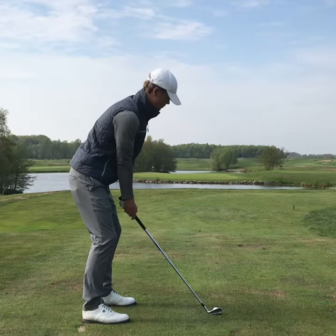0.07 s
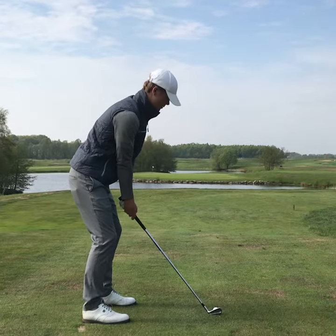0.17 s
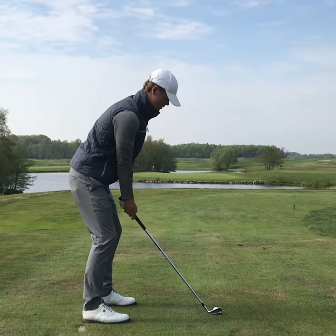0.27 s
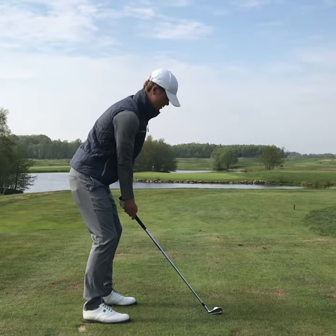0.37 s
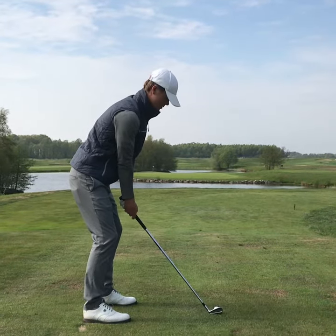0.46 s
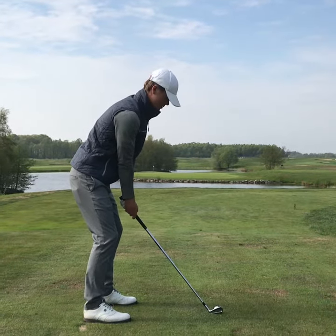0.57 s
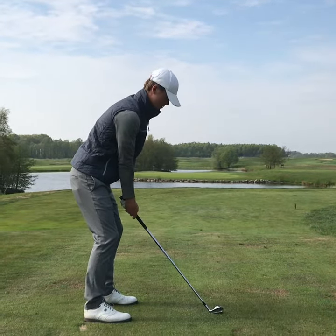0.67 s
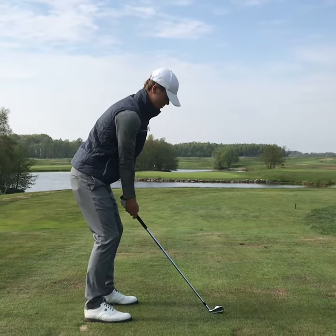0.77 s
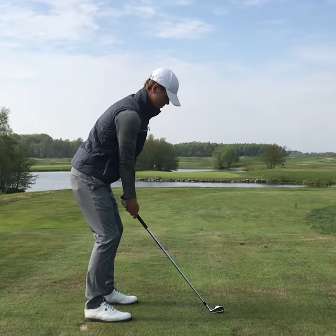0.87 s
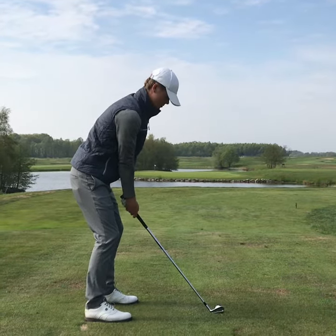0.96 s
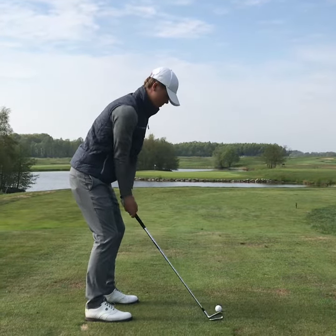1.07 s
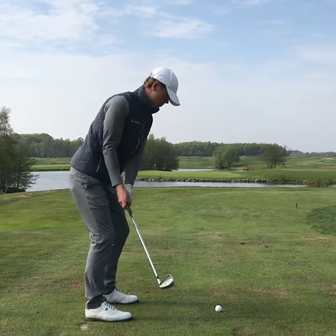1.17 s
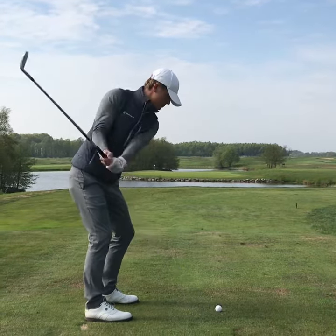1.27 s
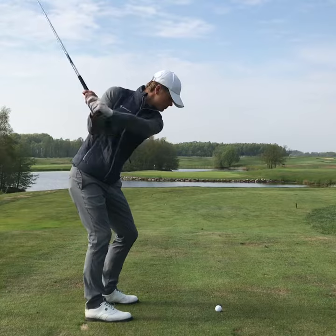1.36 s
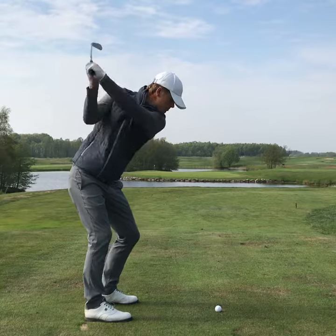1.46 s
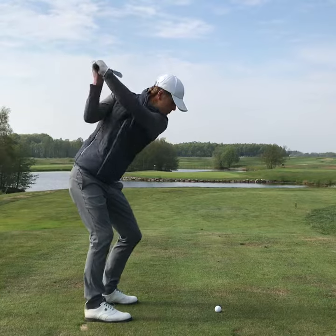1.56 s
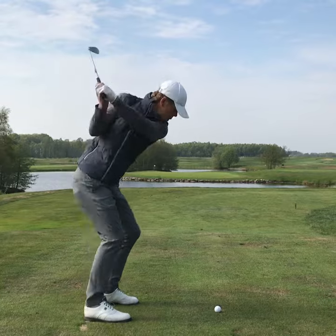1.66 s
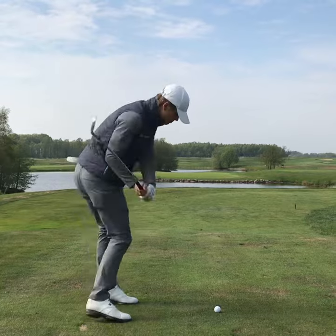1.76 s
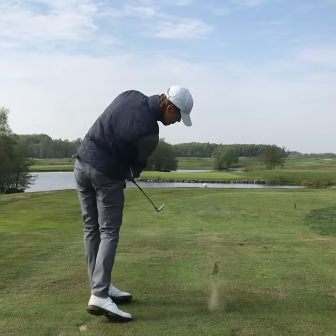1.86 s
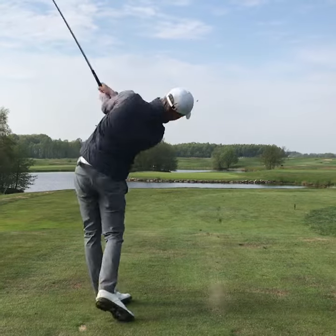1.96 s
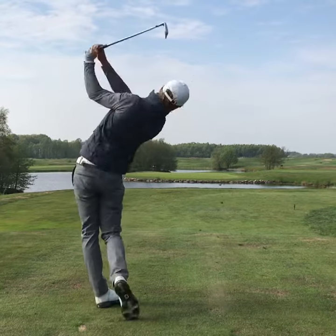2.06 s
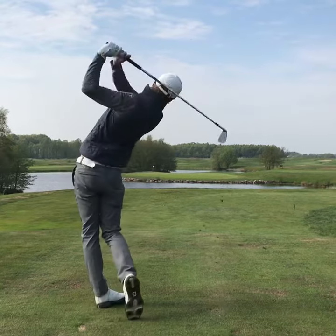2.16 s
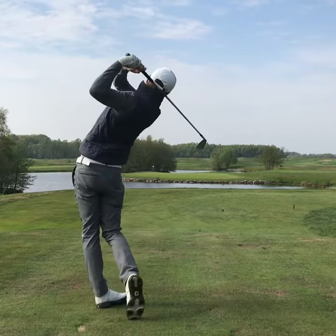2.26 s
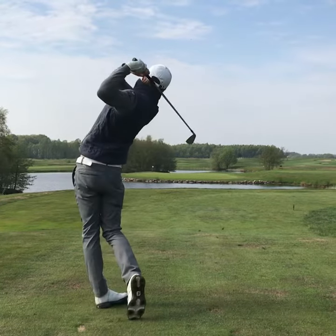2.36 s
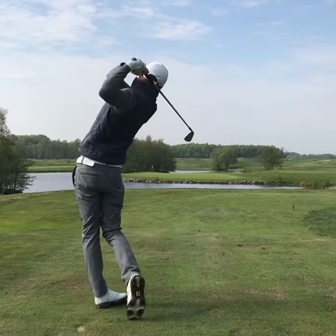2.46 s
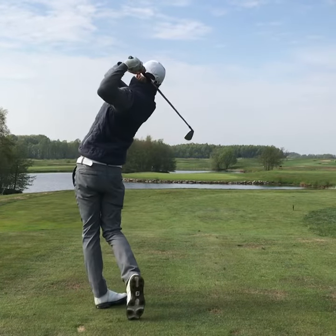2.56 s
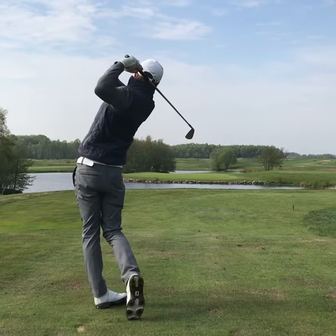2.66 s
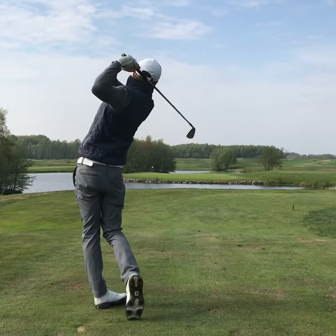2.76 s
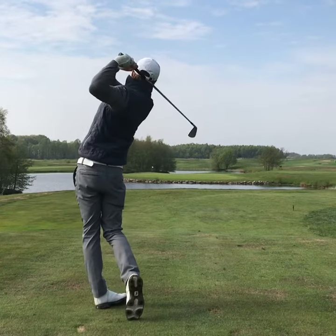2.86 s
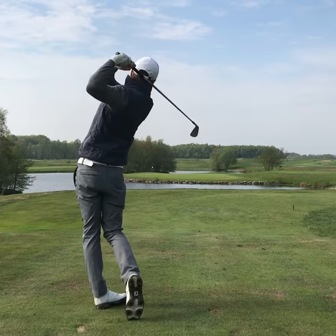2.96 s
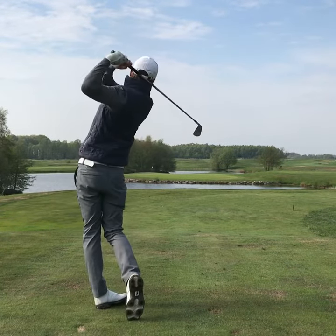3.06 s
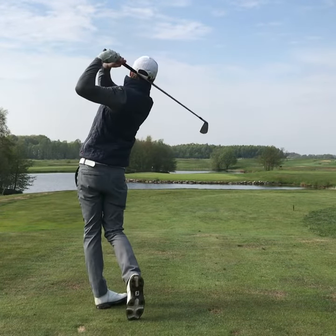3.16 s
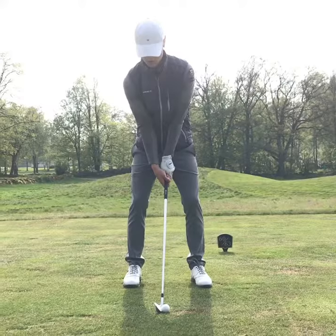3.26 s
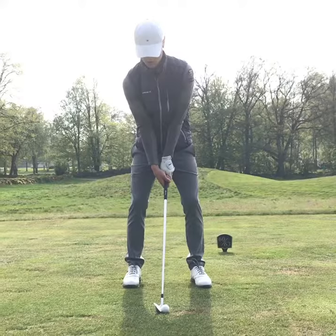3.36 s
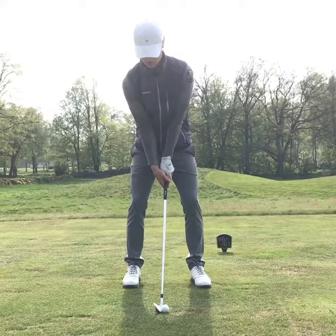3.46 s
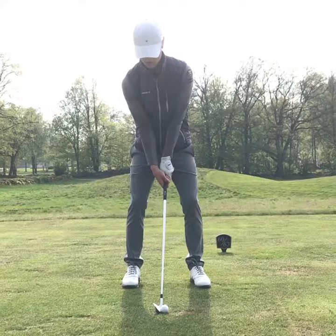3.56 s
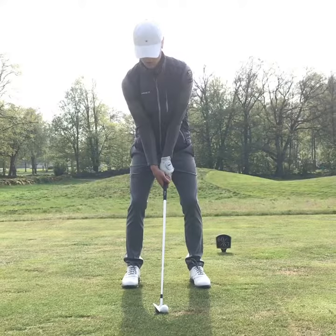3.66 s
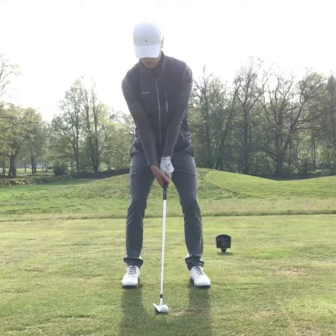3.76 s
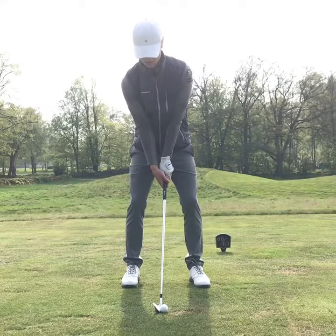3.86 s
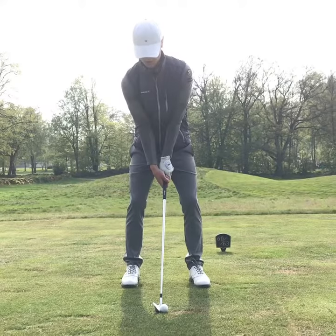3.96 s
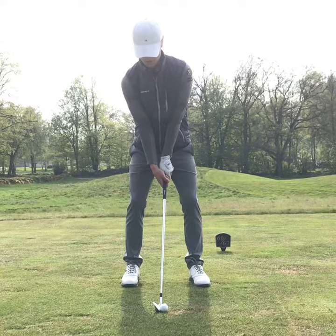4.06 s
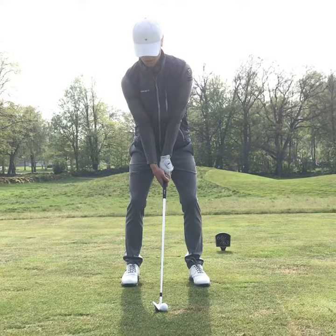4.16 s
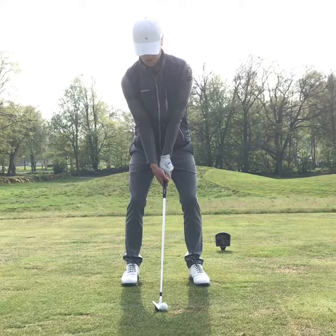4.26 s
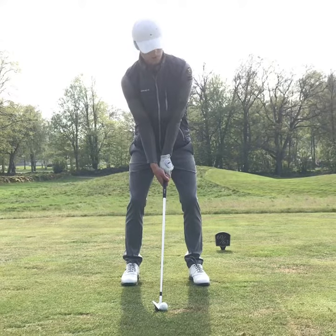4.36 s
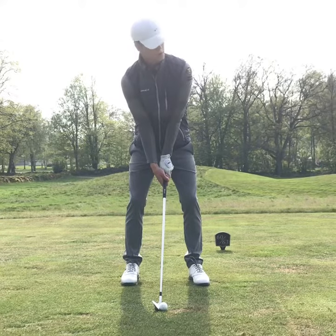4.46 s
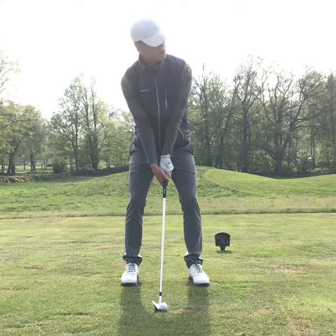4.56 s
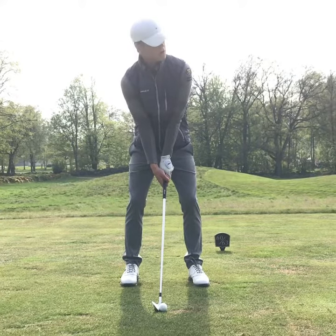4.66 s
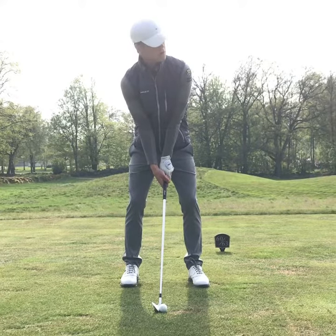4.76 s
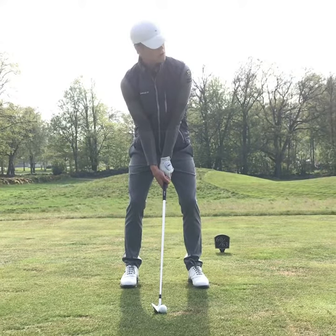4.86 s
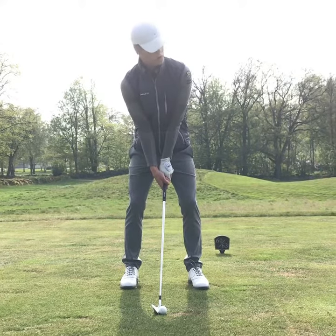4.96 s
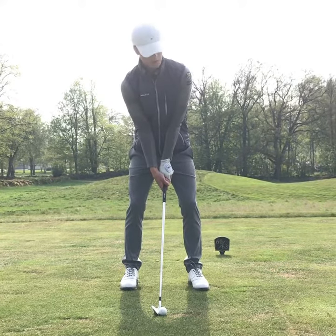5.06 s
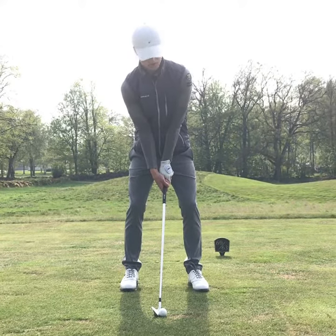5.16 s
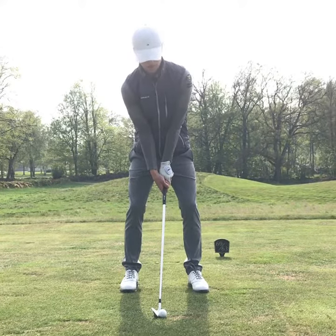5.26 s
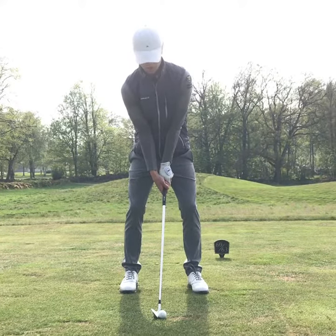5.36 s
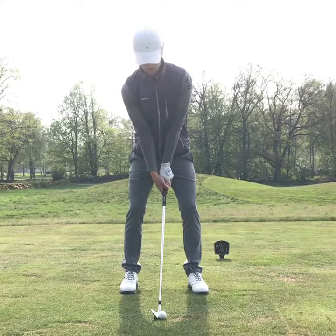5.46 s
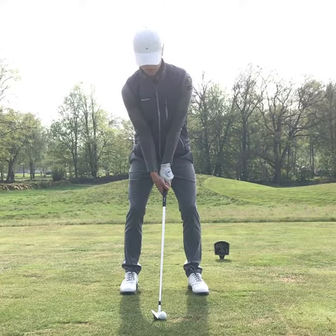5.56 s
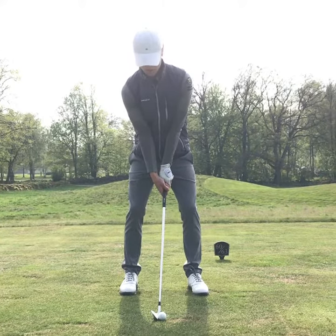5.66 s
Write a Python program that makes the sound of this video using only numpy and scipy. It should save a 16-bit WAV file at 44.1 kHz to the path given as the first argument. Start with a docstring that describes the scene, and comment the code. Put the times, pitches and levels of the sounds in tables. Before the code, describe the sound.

Quiet open golf course with a soft far road hum and tiny distant bird whistles. A jacket rustles, an iron swishes very briefly and cracks hard on the ball, with a low turf thud and grass spray. The place then changes to a woodside, where a songbird sings a quick slurred, trilled phrase with light tree echo. Dull low bumps touch the microphone.

```python
"""A quiet golf course, then a woodside: a far road hums under both, small birds whistle, soft bumps reach the mic.
A golfer swings an iron: his jacket rustles (shaped noise) and the shaft swishes (resonances played at club speed).
The face cracks on the ball (short decaying tones and noise), the head thuds through the turf and grass sprays.
At the woodside a songbird sings two slurs, a trill and a closing flourish, each note a gliding pure tone."""
import sys
import numpy as np
from scipy import signal
from scipy.fft import rfft, irfft
from scipy.io import wavfile
from scipy.ndimage import uniform_filter1d, map_coordinates

SR = 44100
rng = np.random.default_rng(int(sys.argv[2]) if len(sys.argv) > 2 else 0)


def digitize_waveform(pressure):
    """Quantize a signal to 16-bit integers and store it at the path in sys.argv[1].

    Rows of a 2-D input are taken as channels; values are limited to [-1, 1].
    """
    field = np.atleast_2d(pressure).T
    bounded = np.clip(field, -1, 1)
    quanta = np.round(bounded * 32767).astype(np.int16)
    wavfile.write(sys.argv[1], SR, quanta)


N = 252252
T = np.arange(N) / SR  # time of every sample, s

IMPACT_S = 1.9287  # the club face meets the ball
CHANGE_S = 3.26  # the golf course gives way to the woodside

# tone colour of rustling cloth, also used for the spray of grass: f/Hz, relative level/dB
CLOTH_COLOUR = [(900, -20), (2000, -4), (4000, -2), (6500, -7), (8700, -5.5), (10400, -12.5), (13000, -6),
                (15500, -18)]


def undb(db):
    """Turn decibels into a gain."""
    return 10 ** (np.asarray(db) / 20)


def unit(x):
    """Scale a sound to an rms (average strength) of 1."""
    return x / np.sqrt(np.mean(x ** 2))


def add(out, s, x):
    """Mix x into out from time s (in seconds) on."""
    i = int(round(s * SR))
    out[i:i + len(x)] += x[:N - i]


def curve(rows, column=1):
    """One column of a table, joined by straight lines in time."""
    return np.interp(T, [row[0] for row in rows], [row[column] for row in rows])


def noise(points, size=N):
    """Noise of rms 1 whose spectrum follows (f/Hz, relative level/dB) points."""
    hz, db = np.transpose(points)
    bins_hz = np.fft.rfftfreq(size, 1 / SR)
    gain = undb(np.interp(np.log(bins_hz + 1), np.log(hz), db))
    white = rng.standard_normal(size)
    return unit(irfft(rfft(white) * gain, size))


def band(x, hz, width_hz):
    """Let through the part of a sound near one pitch, with gain 1 at the centre."""
    b, a = signal.iirpeak(hz, hz / width_hz, fs=SR)
    return signal.lfilter(b, a, x)


def walk(rate):
    """Smooth random wander of rms 1 that heads for a new value `rate` times a second."""
    hold = int(SR / rate)
    steps = np.repeat(rng.standard_normal(N // hold + 1), hold)[:N]
    return unit(uniform_filter1d(steps, hold))


def fade(t60, delay_s=0):
    """One second of decay that starts after a delay and falls by 60 dB every t60 seconds."""
    age = T[:SR] - delay_s
    return (age >= 0) * np.exp(-np.log(1000) * np.abs(age) / t60)


def thud(hz, rise_s, drop, drop_s):
    """A soft blow of peak near 1: it swells for rise_s while its pitch sinks towards hz."""
    t = T[:SR // 4]
    pitch = hz * (1 + drop * np.exp(-t / drop_s))
    swell = t / rise_s * np.exp(1 - t / rise_s)
    return np.sin(2 * np.pi * np.cumsum(pitch) / SR) * swell


def note(shape, waver=.01):
    """One pure whistle along (t/s, f/Hz, level/dB) points; its pitch wavers a little."""
    s, hz, db = np.transpose(shape)
    t = np.arange(s[0], s[-1], 1 / SR)
    wobble = np.interp(t, np.linspace(0, .4, 100) + s[0], rng.standard_normal(100))
    glide = uniform_filter1d(np.interp(t, s, hz), size=64)
    pitch = glide * (1 + waver * wobble)
    return undb(np.interp(t, s, db)) * np.sin(2 * np.pi * np.cumsum(pitch) / SR)


def trees(x, t60):
    """Sound scattered back by trunks and leaves: many random echoes that die away."""
    echo = rng.standard_normal(SR) * fade(t60, 0.01)
    return signal.oaconvolve(x, echo / np.linalg.norm(echo))[:N]


def outdoors(swell_db=0.65, course_db=-50, woodside_db=-50, course_rumble_db=-52,
             woodside_rumble_db=-49.0, hiss_db=-74):
    """The far road swells a little; a low rumble of moving air lies under it and a fine hiss above."""
    # road and woods heard on the golf course: f/Hz, relative level/dB
    course = [(88, -44.5), (150, -16), (192, -14), (226, -9.5), (413, -14), (451, -14.5), (507, -11),
              (967, -2.5), (1200, -8), (1480, -11.5), (2660, -33), (5000, -39), (6500, -64.5),
              (11000, -120)]
    # road and woods heard at the woodside: f/Hz, relative level/dB
    woodside = [(88, -30), (150, -4), (274, -4), (395, -12.5), (613, -5), (799, -4), (1060, -0.5),
                (1710, -11.5), (2300, -25), (2950, -29), (3170, -24.5), (3950, -34), (4580, -34.5),
                (5000, -49), (6500, -71), (11000, -120)]
    # low rumble of moving air: f/Hz, relative level/dB
    rumble_colour = [(15, -38.5), (28, -15), (40, -6.5), (52, -1), (68, -5), (85, -13.5), (130, -15.5),
                     (220, -36), (600, -80)]
    # fine high hiss: f/Hz, relative level/dB
    hiss_colour = [(2500, -11.5), (5500, 0.5), (7700, -3), (9200, -2), (10400, -6.5), (12000, -1.5),
                   (13700, 0.5), (15500, -2)]
    before = T < CHANGE_S
    road = np.where(before, undb(course_db) * noise(course), undb(woodside_db) * noise(woodside))
    road = road * undb(swell_db * walk(2.5))
    rumble = noise(rumble_colour) * undb(np.where(before, course_rumble_db, woodside_rumble_db))
    return road + rumble + undb(hiss_db) * noise(hiss_colour)


def seesaw(count, start_s=.085, period_s=.222, length_s=.095, level_db=-76):
    """Whistle rows for one far bird that see-saws between a high and a low falling note on an even beat."""
    # the two notes of one call: t/s after the call starts, start f/Hz, end f/Hz
    pair = [(0, 6700, 5950), (.145, 4150, 3600)]
    rows = []
    for k in range(count):
        for lag, start_hz, end_hz in pair:
            rows.append((start_s + k * period_s + lag, length_s, start_hz, end_hz, level_db))
    return rows


def chorus(count, low_hz=3400, high_hz=6600, typical_s=.075, fall_octaves=.13, level_db=-78):
    """Whistle rows for faint, mostly falling calls at random times and pitches, spread over the whole sound."""
    rows = []
    for k, (when, pitch, length, glide) in enumerate(rng.random((count, 4))):
        start_s = (k + when) / count * T[-1]
        hz = low_hz * (high_hz / low_hz) ** pitch
        fall = fall_octaves * (2 * glide - .5)  # below zero the call rises
        rows.append((start_s, typical_s * (.5 + length), hz, hz / 2 ** fall, level_db))
    return rows


def far_birds(direct_db=0, echo_db=-4, flutter_db=3):
    """Thin gliding whistles that flutter on their way through the air and echo off trees."""
    # the clearest far whistles: t/s, length/s, start f/Hz, end f/Hz, level before flutter and echo/dB
    whistles = [(.748, .021, 6000, 4723, -70), (.879, .025, 4550, 4924, -70), (1.118, .11, 3750, 4350, -65),
                (3.6, .1, 6750, 5950, -69), (3.785, .035, 6200, 5700, -68.5),
                (4.285, .07, 4880, 5200, -67.5), (4.441, .14, 3850, 3668, -69.5),
                (4.7, .28, 4450, 4720, -78), (5.462, .2, 3100, 3320, -70)]
    out = np.zeros(N)
    for s, length, start_hz, end_hz, db in whistles + seesaw(count=2) + chorus(count=22):
        middle_hz = (start_hz + end_hz) / 2
        shape = [(0, start_hz, -8), (length / 2, middle_hz, 0), (length, end_hz, -8)]
        add(out, s, undb(db) * note(shape, waver=0.0116))
    out = out * undb(flutter_db * walk(140))
    return undb(direct_db) * out + undb(echo_db) * trees(out, t60=.3)


def bumps():
    """Dull low bumps on the microphone: short low tones that sink in pitch."""
    # each bump: t/s, level/dB, f it sinks towards/Hz
    bump_rows = [(1.122, -31.5, 60), (1.479, -33.5, 46), (1.529, -36, 50), (1.772, -30, 68),
                 (2.072, -36, 77.5), (2.535, -28.5, 56.3), (3.02, -38.5, 61), (3.311, -37, 52),
                 (4.569, -32.5, 65.7)]
    out = np.zeros(N)
    for s, db, hz in bump_rows:
        add(out, s, undb(db) * thud(hz, rise_s=.008, drop=1.0, drop_s=0.0044))
    return out


def jacket(grain_db=0.5, rise_db_per_s=90, finish_s=2.34, finish_db=-9):
    """Smooth fabric slides over itself in small catches: it swells with each turn of the body and dies away."""
    # turns in the backswing and the stroke: t of the fastest moment/s, level there before grain/dB, fade/(dB/s)
    turns = [(1.335, -59, 36), (1.9, -55.5, 19)]
    power = 0
    for s, db, fade_db_per_s in turns:
        below_peak_db = np.maximum(rise_db_per_s * (s - T), fade_db_per_s * (T - s))
        power = power + undb(db - below_peak_db) ** 2
    # the body stops in the finish and the rubbing drops
    stopped = np.clip((T - finish_s) / .02 + .5, 0, 1)
    return noise(CLOTH_COLOUR) * np.sqrt(power) * undb(finish_db * stopped + grain_db * walk(130))


def swish():
    """Eddies (small whirls of air) whistle higher the faster the club moves, loudest as it passes nearest the mic."""
    # air rushing round the club: t/s, level/dB, speed relative to the fastest
    swing = [(1.82, -66, 0.59), (1.855, -52, 0.78), (1.88, -46, 0.98), (1.902, -38.5, 0.9674),
             (1.915, -46, 0.91), (1.928, -46, 1), (1.95, -56.5, 0.83), (1.99, -68, 0.5596)]
    # eddies shed by head and shaft at full speed: f/Hz, width/Hz, relative level/dB
    eddy_bands = [(540, 120, 2), (1250, 700, -2), (1880, 1100, -10), (3350, 1000, -13.5),
                  (7000, 8900, -22.5)]
    eddies = unit(sum(undb(db) * band(rng.standard_normal(SR), hz, width) for hz, width, db in eddy_bands))
    moving = (T > swing[0][0]) & (T < swing[-1][0])
    # like a tape: a faster club plays the eddies faster, so their pitch rises
    travel = np.cumsum(curve(swing, column=2)[moving])
    out = np.zeros(N)
    out[moving] = map_coordinates(eddies, [travel], mode="wrap") * undb(curve(swing)[moving])
    return out


def strike(ring_db=-14.0, snap_db=-4, snap_t60=.004, snap_s=.0001, crack_db=-20, crack_t60=0.024,
           ground_db=0, ground_s=0.0022, knock_db=-14.5, air_db=-50, air_t60=0.29):
    """Face meets ball: a hard snap starts short modes and a crack, repeated off the ground, with a faint tail."""
    # ring of club head and ball: f/Hz, relative level/dB, time to fall 60 dB/s
    club_modes = [(955, -4, .024), (1575, -2, .02), (2235, 1, .013), (2590, -10, .016), (3280, -1, .015),
                  (3440, -3, .015), (4215, -3, .017), (4720, -2, .017), (5125, -3, .017), (6085, -1, .016),
                  (6680, -2, .016), (8300, -13, .016), (8550, -9, .015), (8910, -11, .016),
                  (10820, -17, .016), (12620, -19, .015), (13320, -17, .016), (14560, -17, .016)]
    t = T[:SR]
    ring = 0
    for k, (hz, db, t60) in enumerate(club_modes):
        # neighbouring modes swing in opposite directions
        ring = ring + (-1) ** k * undb(db) * fade(t60) * np.sin(2 * np.pi * hz * t)
    # the face flexes for only a few cycles while the ball is pressed against it
    flex_modes = [(3300, -3), (5600, -2.5), (8500, -6.5), (13000, -8)]
    flex = sum(undb(db) * np.sin(2 * np.pi * hz * (t - snap_s)) for hz, db in flex_modes)
    snap = flex * fade(snap_t60, snap_s)
    grit = noise([(250, -14), (600, -2), (1100, 1.5), (2200, -3.5), (3500, 1), (6500, -2.5),
                  (10000, -3.5), (15500, -6)], size=SR)
    crack = grit * (fade(crack_t60) + undb(ground_db) * fade(.011, ground_s))
    # a 990 Hz knock follows as the hit bounces off the ground
    knock = fade(0.01978, ground_s) * np.sin(2 * np.pi * 990 * t)
    tail = noise([(200, -26), (1000, 5), (3000, -6), (15000, -13.5)], size=SR) * fade(air_t60)
    hit = undb(ring_db) * ring + undb(snap_db) * snap + undb(crack_db) * crack
    hit = hit + undb(knock_db) * knock + undb(air_db) * tail
    out = np.zeros(N)
    add(out, IMPACT_S, hit)
    return out


def turf(thud_db=-25.5, shake_db=-39, spray_db=-54, spray_t60=0.27):
    """The head digs into the ground, which thuds and shakes, and throws up crumbs of soil and grass."""
    out = np.zeros(N)
    # fast random level changes make the noise crumbly
    crumbs = unit(noise(CLOTH_COLOUR, size=SR) * undb(3 * walk(900)[:SR]))
    add(out, IMPACT_S, undb(spray_db) * crumbs * fade(spray_t60))
    add(out, IMPACT_S + .005, undb(thud_db) * thud(hz=67, rise_s=.006, drop=2.5, drop_s=0.0081))
    add(out, IMPACT_S + 0.012, undb(shake_db) * thud(hz=139.7, rise_s=0.0091, drop=2.1, drop_s=0.0072))
    return out


def phrase(name, count, lag_s=0):
    """(t/s, level/dB) of each syllable: an even beat that grows softer, with lag_s added to its first step."""
    # phrases of one repeated syllable: start t/s, rate/(syllables/s), first level/dB, fade/(dB/syllable)
    song = {"slur": (3.2997, 18.2, -38, .4), "trill": (3.4446, 10.47, -39, .35),
            "arch": (4.272, 6.235, -43, 2)}
    start, rate, db, fade_db = song[name]
    return [(start + k / rate + lag_s * (k > 0), db - fade_db * k) for k in range(count)]


def songbird(echo_db=-13.5, echo_t60=0.36, flick_lead_s=.022, flick_db=-11, tip_lead_s=.06, tip_db=-5.5):
    """Two slurs, a quick trill and two arched closing notes, echoed by the wood."""
    # syllable shapes by name: t from the syllable's reference moment/s, f/Hz, relative level/dB
    syllables = { "slur": [(-.016, 5560, -26), (-.006, 6650, -26), (-.002, 5560, -31), (.001, 4560, -6),
                 (.005, 3750, -4.5), (.012, 3494, -8), (.016, 3400, -30)], "flick": [(-.009, 5000, -37),
                 (-.004, 4550, 0), (0, 3554, -8.5), (.004, 4930, -9), (.008, 5900, -16), (.010, 6200, -24)],
                 "trill": [(-.012, 3240, -37), (-.005, 4097, -7), (.002, 4620, -6.5), (.006, 5280, -33),
                 (.009, 4201, -4), (.011, 3560, -10), (.019, 3150, -10), (.026, 2679, -11.5),
                 (.029, 2317, -37)], "tip": [(-.017, 4530, -15), (-.012, 4080, -5), (-.008, 3510, -20.5),
                 (0, 4490, -1), (.004, 3950, -6.5), (.007, 3700, -24)], "arch": [(-.04, 2234, -18),
                 (-.024, 2543, -11), (-.01, 3186, -5), (0, 3640, -7), (.01, 3250, -8), (.019, 2690, -10),
                 (.024, 2350, -20)]}
    notes = [("slur", s, db) for s, db in phrase("slur", count=2)]
    # a faint flick leads into each trill note
    for s, db in phrase("trill", count=8, lag_s=.008):
        notes += [("flick", s - flick_lead_s, db + flick_db), ("trill", s, db)]
    # and a short tip into each arch
    for s, db in phrase("arch", count=2):
        notes += [("tip", s - tip_lead_s, db + tip_db), ("arch", s, db)]
    out = np.zeros(N)
    for name, s, db in notes:
        shape = syllables[name]
        add(out, s + shape[0][0], undb(db) * note(shape))
    return out + undb(echo_db) * trees(out, echo_t60)


def scene():
    """All sources at one microphone."""
    air = outdoors() + far_birds() + bumps()
    golfer = jacket() + swish() + strike() + turf()
    return (air + golfer + songbird())[None]


def record(dry):
    """The level dips briefly as the background changes; the highest peaks flatten and the top is cut."""
    dip = np.clip(np.abs(T - CHANGE_S) / .035, .12, 1)
    flattened = np.clip(dry * dip, -.9, .9)
    top_cut = signal.ellip(10, .1, 70, 15950, fs=SR, output="sos")  # steep low-pass at 15950 Hz
    return signal.sosfilt(top_cut, flattened)


dry = scene()
out = record(dry)
digitize_waveform(out)
```